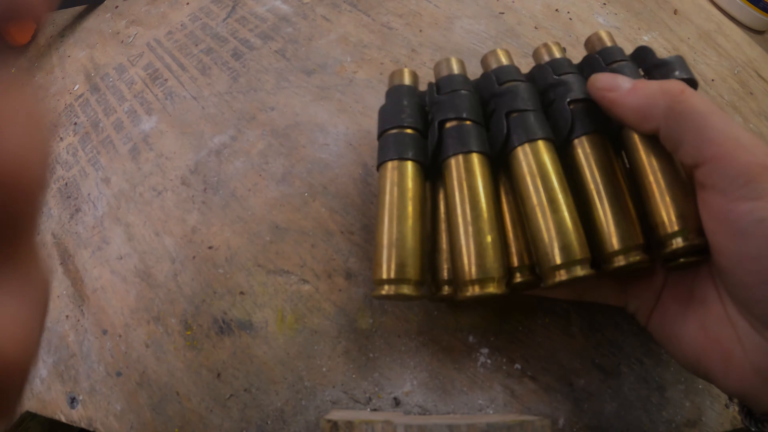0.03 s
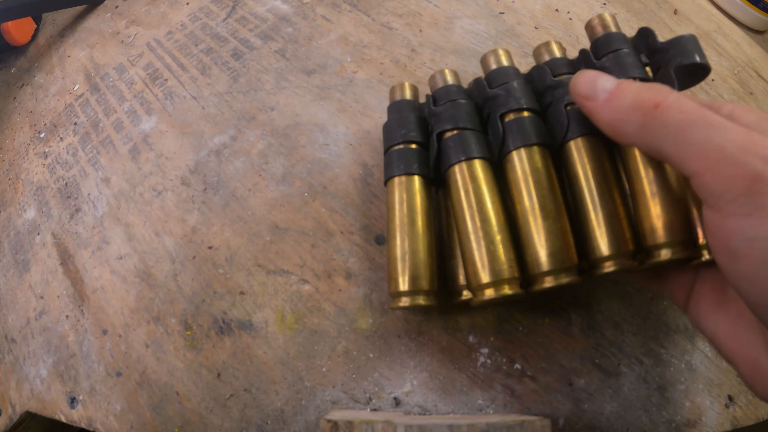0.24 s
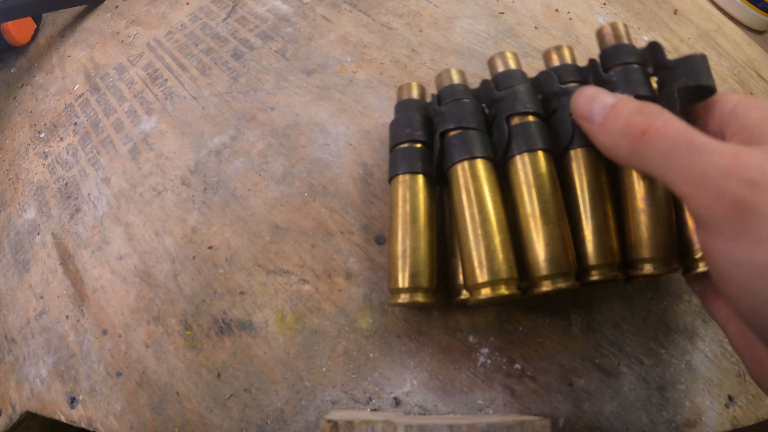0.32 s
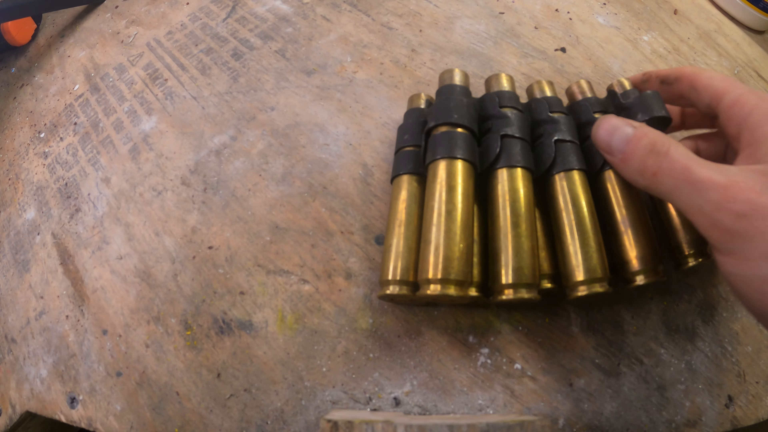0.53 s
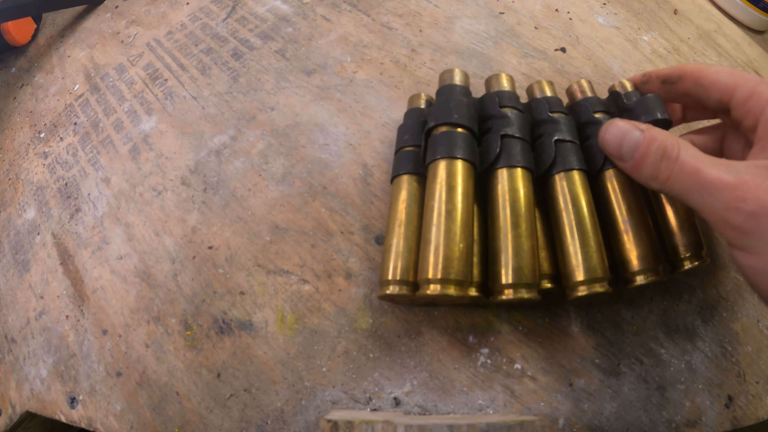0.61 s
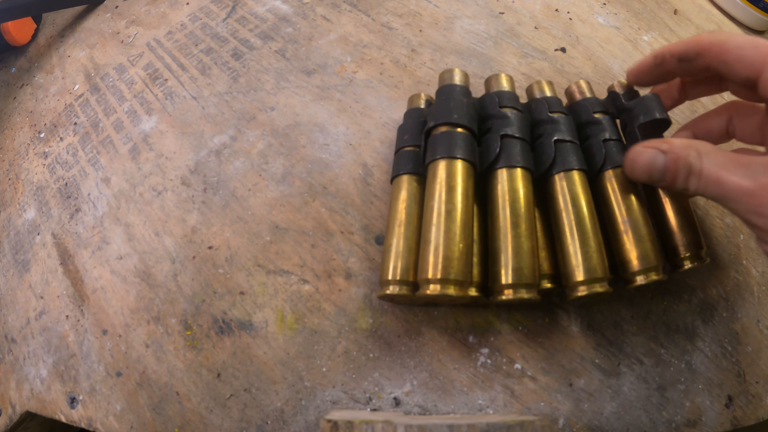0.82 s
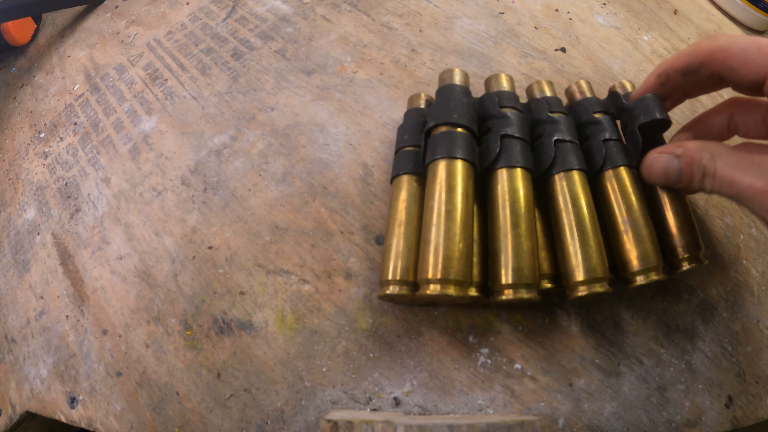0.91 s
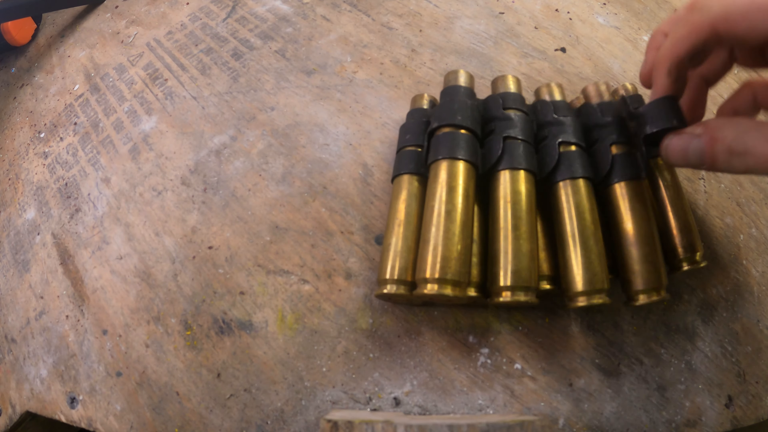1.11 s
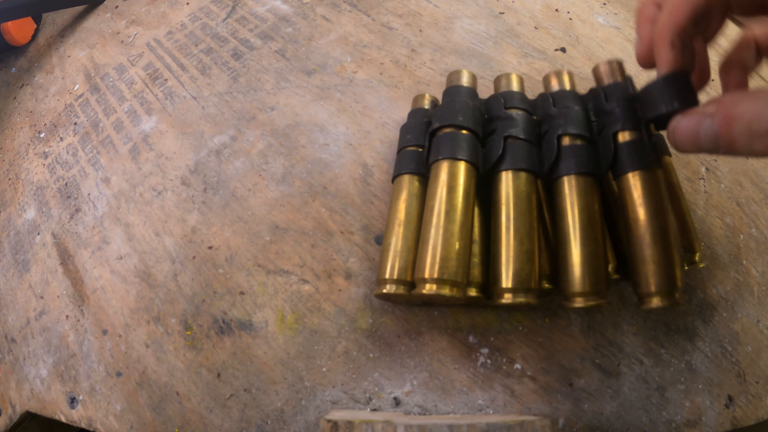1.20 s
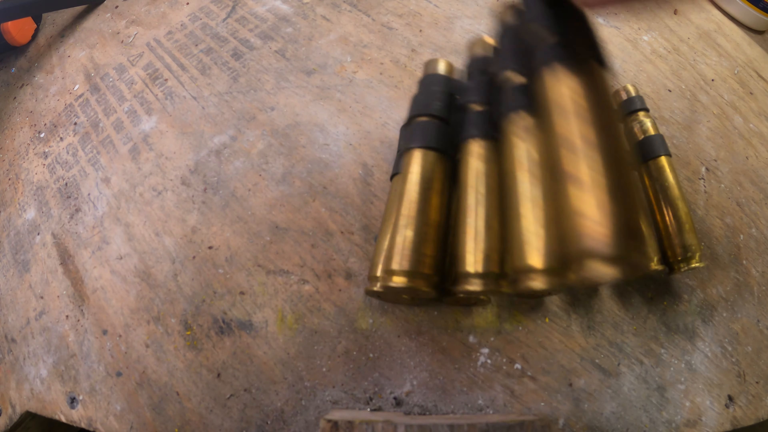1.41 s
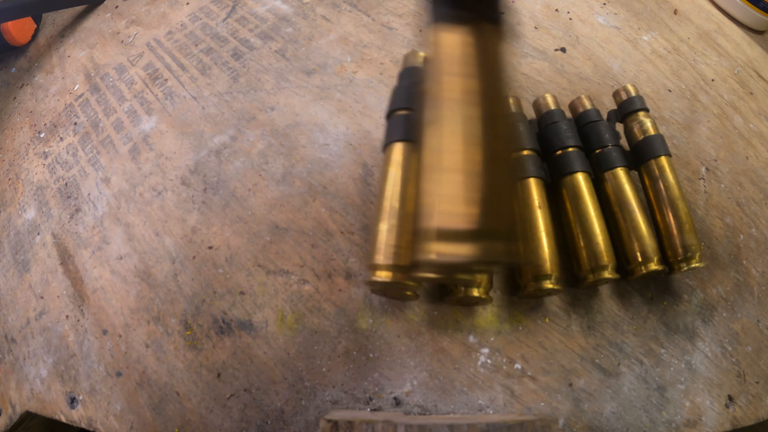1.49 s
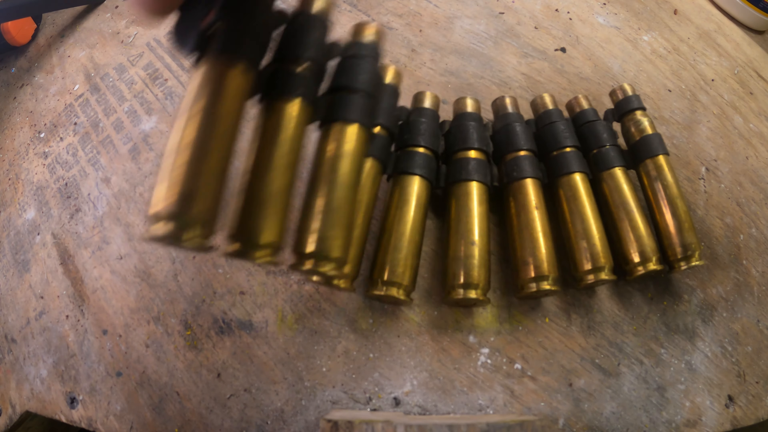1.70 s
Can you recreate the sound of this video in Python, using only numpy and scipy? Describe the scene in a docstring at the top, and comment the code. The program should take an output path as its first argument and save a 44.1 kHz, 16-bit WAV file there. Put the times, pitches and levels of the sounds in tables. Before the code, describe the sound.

Empty brass cartridge cases clink against steel links and knock on a wooden workbench. A soft low boom and light ticks start at 0.05 s, a firm knock at 0.17, clinks near 0.38, then the loudest clatter, scrape and thump at 0.47-0.58. It quiets from 0.7; a modest clink and knock come at 1.1, faint taps, scuffs and a tiny squeak from 1.3 to 1.7. Close, slight small-room echo.

```python
"""A soft knock and a low boom come first, then bright clinks: a short belt of empty brass cartridge
cases is laid on a wooden workbench and nudged into place. Cases and steel links sound as noise bursts
with decaying partials, the wood as damped knocks exciting board modes, the bench top as low resonances.
Shaped noise makes the sliding and handling; dying noise echoes make the small workshop."""
import sys
import numpy as np
from scipy import signal
from scipy.fft import rfft, irfft, next_fast_len
from scipy.io import wavfile
from scipy.ndimage import uniform_filter1d

SR = 44100
rng = np.random.default_rng(int(sys.argv[2]) if len(sys.argv) > 2 else 0)


def persist_wave(psi):
    """Save psi, clipped to +-1, as 16-bit WAV."""
    counts = np.round(np.clip(psi, -1, 1) * 32767).astype(np.int16)
    wavfile.write(sys.argv[1], SR, np.atleast_2d(counts).T)


N = 77175
T = np.arange(N) / SR  # time [s]

# relative spectrum of metal contacts: f/Hz, level/dB
CLACK_SPECTRUM = [(1200, -10.5), (2000, -3.5), (3400, -0.5), (5300, -2), (5900, 5), (6500, -1), (8300, -19),
                  (9500, -15.5), (11000, -23), (12500, -18), (16000, -34)]
# relative spectrum of brass scuffing on wood: f/Hz, level/dB
SCUFF_SPECTRUM = [(80, -9.5), (270, 2), (540, 1), (720, -5.5), (1050, -9), (1500, -14.5), (16000, -59)]


def from_db(db):
    """Amplitude ratio: 20 dB for each factor of ten."""
    return 10 ** (np.asarray(db) / 20)


def rms_one(x):
    """Normalisation to unit root-mean-square level."""
    return x / np.sqrt(np.mean(x ** 2) + 1e-20)


def level(curve):
    """Amplitude envelope: gain over time, interpolated in dB between (t/s, level/dB) points."""
    return from_db(np.interp(T, *np.transpose(curve)))


def colour(x, points, keep_power=True):
    """Minimum-phase filtering through (f/Hz, level/dB) points; white noise can keep its power."""
    size = 2 * next_fast_len(N)
    hz, db = np.transpose(points)
    bin_hz = np.arange(size // 2 + 1) * SR / size
    gain = from_db(np.interp(np.log(bin_hz + 1), np.log(hz), db))
    if keep_power:
        gain = rms_one(gain)
    # folding the cepstrum onto positive time makes the filter causal
    cepstrum = irfft(np.log(gain))
    cepstrum[1:size // 2] *= 2
    cepstrum[size // 2 + 1:] = 0
    response = np.exp(rfft(cepstrum))
    return irfft(rfft(x, size) * response)[:N]


def ring(x, hz, t60):
    """Damped resonance: a unit click excites a decaying sine of initial height 1."""
    radius = np.exp(-np.log(1000) / (t60 * SR))
    angle = 2 * np.pi * hz / SR
    feedback = [1, -2 * radius * np.cos(angle), radius * radius]
    return signal.lfilter([0, np.sin(angle)], feedback, x + 1e-18)


def partials(start, hz, gains, t60):
    """Modal superposition: decaying sines of random sign, struck together."""
    t = np.arange(SR // 3)[:, None] / SR
    signs = rng.choice([-1, 1], len(hz))
    modes = gains * signs * np.sin(2 * np.pi * hz * t) * np.exp(-np.log(1000) * t / t60)
    silence = np.zeros(int(abs(start) * SR))
    return np.concatenate([silence, np.sum(modes, axis=1), np.zeros(N)])[:N]


def clicks(times, gains):
    """Impulsive excitation: one single-sample click at each time."""
    return np.bincount((np.abs(times) * SR).astype(int), gains, N)[:N]


def decay(start, seconds):
    """Exponential relaxation after a sudden start; amplitude falls to 1/e in the given time."""
    return (T >= start) * np.exp(-np.clip((T - start) / seconds, 0, 20))


def grains(grain_db, size=40):
    """Friction as tiny contacts of uneven strength: noise modulated by smoothed noise."""
    strength = rms_one(uniform_filter1d(rng.standard_normal(N), size))  # size in samples
    gain = from_db(grain_db * np.clip(strength, -2, 2))
    return rms_one(rng.standard_normal(N) * gain)


def air():
    """Stationary background: the quiet air of the workshop as steady, mostly low noise."""
    # relative spectrum: f/Hz, level/dB
    air_spectrum = [(40, -1), (300, -3.5), (1500, -39), (9000, -40.5)]
    return from_db(-68) * colour(rng.standard_normal(N), air_spectrum)


def reflections(x, delay_s, t60):
    """Diffuse reverberation: convolution with decaying noise of unit energy."""
    tail = rng.standard_normal(N) * decay(delay_s, t60 / np.log(1000))
    return signal.fftconvolve(x, tail / np.linalg.norm(tail))[:N]


def room(dry):
    """Room absorption: the workshop's dense echoes lose treble."""
    # level of the echoes: f/Hz, level/dB
    room_level = [(50, -16), (400, -16), (8000, -24.5)]
    echoes = reflections(dry, delay_s=0.002, t60=0.46)
    return colour(echoes, room_level, keep_power=False)


def stereo(mid):
    """Mid-side decomposition: a short diffuse side signal widens the nearly centred sound."""
    # side relative to mid: f/Hz, level/dB
    width = [(50, -15), (700, -22), (2800, -13), (5800, -16), (9000, -8.5)]
    side = colour(reflections(mid, 0, t60=0.035), width, keep_power=False)
    pan_db = -0.8  # left over right
    return np.array([(mid + side) * from_db(pan_db / 2), (mid - side) * from_db(-pan_db / 2)])


def sliding():
    """Sliding friction: brass drags over the wood grain while the links chafe the cases."""
    # belt dragging over the wood: t/s, level/dB
    drag_curve = [(0, -66), (.15, -43), (.2, -32), (.29, -37.5), (.44, -36), (.57, -28), (.65, -38.5),
                  (.76, -54.5), (.97, -79), (1.03, -48.5), (1.17, -52), (1.29, -39), (1.36, -61),
                  (1.41, -49), (1.6, -39), (1.67, -50.5)]
    # links chafing: t/s, level/dB
    chafe_curve = [(0, -77.5), (.07, -45.5), (.24, -47.5), (.44, -46.5), (.55, -31.5), (.63, -50.5),
                   (.87, -72.5), (.99, -77.5), (1.11, -55.5), (1.19, -67), (1.75, -64)]
    drag = colour(grains(grain_db=3, size=200), SCUFF_SPECTRUM)
    chafe = colour(grains(grain_db=4.5, size=90), CLACK_SPECTRUM)
    return level(drag_curve) * drag + level(chafe_curve) * chafe


def handling():
    """Low-frequency excitation: handling makes the bench rumble, as noise of changing level."""
    # level of the rumble: t/s, level/dB
    handling_curve = [(0, -50.5), (.08, -37), (.45, -39.5), (.56, -18), (.68, -44), (.93, -53.5),
                      (1.13, -40), (1.35, -44.5), (1.75, -37.5)]
    # relative spectrum: f/Hz, level/dB
    rumble_spectrum = [(20, -12), (66, 3), (90, -6), (125, -3), (180, -23.5), (2000, -57.5)]
    return level(handling_curve) * colour(rng.standard_normal(N), rumble_spectrum)


def bench():
    """Forced resonance: soft pushes of settling weight set the bench top and its octave booming."""
    # settling weight: t/s, relative level/dB, boom f/Hz
    thumps = [(.052, -11.5, 71.6), (0.163, -16.5, 71), (0.502, -13.5, 63), (.533, -17, 61.5),
              (1.095, -21, 71.7)]
    thump_db, octave_db, boom_t60_s, press_s = -4, -16, 0.28, 0.0014
    boom = np.zeros(N)
    for start, db, hz in thumps:
        push = clicks([start], [from_db(db + thump_db)])
        boom += ring(push, hz, boom_t60_s)
        boom += from_db(octave_db) * ring(push, 2 * hz, boom_t60_s)
    press = T * decay(0, press_s)  # pressure pulse that softens each click
    return signal.fftconvolve(boom, press / press.sum())[:N]


def skids():
    """Stick-slip friction: a rim on the wood squeaks, a rough rising tone with its octave."""
    # squeaks: start t/s, end t/s, first f/Hz, last f/Hz
    skid_rows = [(1.429, 1.446, 1250, 1800), (1.440, 1.457, 1030, 1230)]
    skid_db, octave_db, roughness = -38.5, -10, 0.1  # roughness: rms share of the frequency
    out = np.zeros(N)
    for start, end, first_hz, last_hz in skid_rows:
        along = np.clip((T - start) / (end - start), 0, 1)
        waver = roughness * rms_one(uniform_filter1d(rng.standard_normal(N), size=20))
        hz = (first_hz + along * (last_hz - first_hz)) * (1 + waver)
        phase = 2 * np.pi * np.cumsum(hz) / SR
        tone = np.sin(phase) + from_db(octave_db) * np.sin(2 * phase)
        out += from_db(skid_db) * np.sin(np.pi * along) * tone
    return out


def pings():
    """Free vibration: a steel link springs free and rings on one clear note."""
    # released links: t/s, level/dB
    releases = [(.525, -28.5), (.558, -30), (1.11, -31.5), (1.322, -47)]
    times, db = np.transpose(releases)
    return ring(clicks(times, from_db(db)), hz=3420, t60=0.071)


def knocks():
    """Impact on a plate: a rim on wood gives a damped knock, a scuff and ringing board modes."""
    # impacts: t/s, level/dB, contact f/Hz, scuff decay t/s
    impacts = [(0.047, -29.5, 550, 0.011), (0.164, -19, 365, 0.006), (0.1761, -13, 886, 0.011),
               (.318, -28.5, 480.1, 0.047), (0.363, -24.5, 852, 0.0089), (0.4712, -13, 449, 0.0022),
               (0.4734, -16.5, 693, 0.0055), (.518, -17, 514, 0.032), (0.5412, -10.5, 976, 0.01),
               (0.547, -22, 600, 0.024), (.796, -40.5, 694, 0.015), (0.951, -49.5, 1655, 0.002),
               (0.955, -45.5, 277, 0.0019), (0.999, -48.5, 298, 0.0033), (1.094, -31.5, 730, 0.026),
               (1.322, -33, 577, 0.012), (1.381, -30.5, 555, 0.018), (1.393, -31, 410, 0.015),
               (1.431, -30, 405, 0.019), (1.585, -31, 566, 0.009), (1.711, -33.5, 526, 0.012)]
    # board modes: f/Hz, relative level/dB, t60/s
    wood_modes = [(293.3, -5, 0.22), (493.4, -8.5, 0.15), (557, -12.5, 0.158), (767.7, -17.5, 0.23),
                  (914, -12.5, 0.081), (1052, -19.5, 0.14)]
    scuff_db, wood_db = -4, 1.5
    swell_cycles = 0.75  # cycles until the knock is strongest
    focus_db = 5.5  # loss of a mode per octave away from the contact's pitch
    out, scuffs = np.zeros(N), np.zeros(N)
    for start, db, hz, scuff_s in impacts:
        cycles = np.maximum(T - start, 0) * hz
        swell = cycles / swell_cycles
        out += from_db(db) * swell * np.exp(1 - swell) * np.sin(2 * np.pi * cycles)
        scuffs += from_db(db + scuff_db) * rng.standard_normal(N) * decay(start, scuff_s)

    times, db, contact_hz, _ = np.transpose(impacts)
    for hz, mode_db, t60 in wood_modes:
        octaves_away = np.abs(np.log2(hz / contact_hz))
        strength_db = db + mode_db + wood_db - focus_db * octaves_away
        strength_db += 2 * rng.standard_normal(len(times))
        out += ring(clicks(times, from_db(strength_db)), hz, t60)
    return out + colour(scuffs, SCUFF_SPECTRUM)


def clinks():
    """Impact and modal response: a tick and rattle, link partials and a case ringing near 6 kHz."""
    # brass on brass and steel:
    # t/s, relative level/dB, rattle decay t/s, relative case-ring level/dB, relative treble level/dB
    contacts = [(0.0609, -22, 0.004, -2, -1), (0.065, -22, 0.0084, 2.5, 3.5),
                (0.1306, -18.5, 0.0017, -5, -16.5), (0.3775, -16.5, 0.0019, 0, -20.5),
                (0.384, -17.5, 0.0026, -2.5, -11.5), (.389, -23, 0.011, -11, 3.5),
                (0.4758, -24.5, 0.0022, 3, -24.5), (0.5016, -24.5, 0.034, 7, -15.5),
                (0.5174, -24, 0.002, 8.5, -11.5), (.529, -25.5, 0.012, 10.5, 6.5),
                (.541, -29.5, 0.0017, 3.5, -6.5), (0.5568, -29.5, 0.017, -2, 12),
                (0.578, -29, 0.0029, 5.5, -3), (0.6607, -25.5, 0.0055, -10.5, -0.5),
                (0.7952, -33.5, 0.004, -6.5, -23.5), (1.0197, -35.5, 0.0049, -6.5, -23),
                (1.076, -39, 0.044, -10, -4), (1.09, -25.5, 0.011, 2.5, 10), (1.112, -26, 0.004, -14, -4),
                (1.3203, -34, 0.0073, -3.5, 1.5), (1.53, -47.5, 0.017, 9, 12),
                (1.5846, -33.5, 0.0045, -6, 6), (1.71, -40, 0.01, -1.5, 0.5)]
    # light taps of the links: t/s, relative level/dB
    light_taps = [(0.0528, -28.5), (0.139, -29), (0.177, -33), (0.225, -33.5), (0.3069, -29), (0.36, -24.5),
                  (0.3732, -21.5), (0.465, -31), (0.545, -25), (0.707, -41.5), (0.995, -56), (1.1733, -47),
                  (1.0121, -45), (1.2296, -49), (1.268, -45), (1.28, -49), (1.3143, -41), (1.382, -58),
                  (1.388, -44), (1.411, -47.5), (1.494, -45.5), (1.572, -48), (1.618, -40), (1.6243, -41.5),
                  (1.69, -46)]
    # case modes: f/Hz, relative level/dB, t60/s
    case_modes = [(3338, -16.5, 0.055), (5037, -11.5, 0.087), (5570, -4.5, 0.049), (5828, -1.5, 0.068),
                  (5920, -6.5, 0.13), (6015, -2, 0.053), (9400, -34, 0.13), (10340, -32.5, 0.082)]
    clack_db, tick_db, rattle_grain_db = -2.5, -5.5, 4
    tap_rattle_s, tap_ring_db, tap_top_db = 0.0054, -9.5, -5.5  # all taps are equally brief
    attack_share, ring_rise = 0.16, 0.25  # build-up times as shares of the rattle time
    case_spread = 0.005  # no two cases ring at quite the same pitch
    link_lowest_hz, link_highest_hz, link_db, link_t60_s = 2558, 6926, -16, 0.051
    split_hz = 8300  # each contact has its own treble level above this

    body, top, rings = np.zeros(N), np.zeros(N), np.zeros(N)
    rattle = grains(rattle_grain_db)
    hz, mode_db, t60 = np.transpose(case_modes)
    taps = [(start, db, tap_rattle_s, tap_ring_db, tap_top_db) for start, db in light_taps]
    for start, db, rattle_s, ring_db, top_db in contacts + taps:
        envelope = decay(start, rattle_s) - decay(start, attack_share * rattle_s) / 2
        burst = np.roll(rattle, rng.integers(N)) * envelope
        hit = from_db(db) * (burst + clicks([start], [from_db(tick_db)]))
        body += hit
        top += hit * from_db(top_db)

        strength = from_db(db + ring_db + mode_db + 2 * rng.standard_normal(len(hz)))
        case_hz = hz * (1 + case_spread * rng.uniform(-1.4, 1))
        case = partials(start, case_hz, strength, t60)
        link_hz = rng.uniform(link_lowest_hz, link_highest_hz, size=6)
        link = partials(start, link_hz, from_db(db + link_db), link_t60_s)
        rings += (case + link) * (1 - decay(start, ring_rise * rattle_s))

    low = signal.butter(3, split_hz, "low", fs=SR, output="sos")
    high = signal.butter(3, split_hz, "high", fs=SR, output="sos")
    clack = signal.sosfilt(low, body) + signal.sosfilt(high, top)
    return rings + from_db(clack_db) * colour(clack, CLACK_SPECTRUM)


def scene():
    """Linear superposition: the belt on the bench, the workshop's echo and its quiet air."""
    dry = sliding() + handling() + bench() + skids() + pings() + knocks() + clinks()
    return stereo(dry + room(dry) + air())


def record(dry):
    """Band limitation: a steep elliptic low-pass cuts the top above 15.9 kHz."""
    low_pass = signal.ellip(10, .1, 80, 15900, fs=SR, output="sos")  # ripple 0.1 dB, stopband 80 dB
    return signal.sosfilt(low_pass, dry)


dry = scene()
out = record(dry)
persist_wave(out)
```